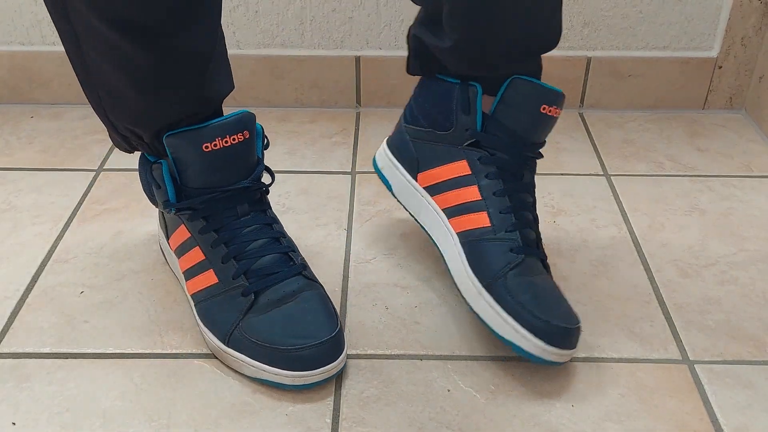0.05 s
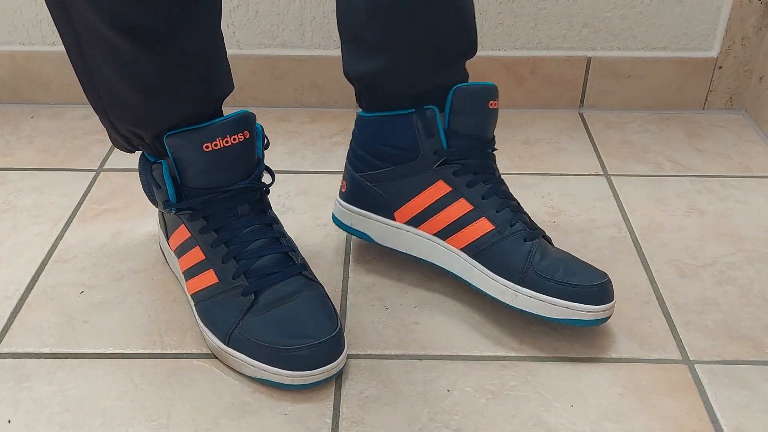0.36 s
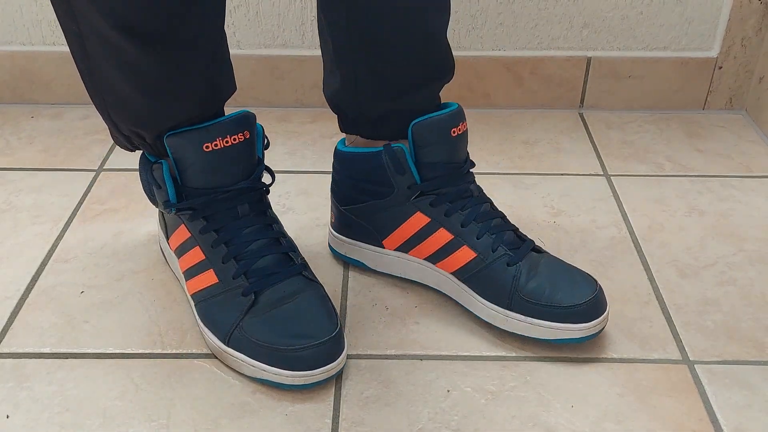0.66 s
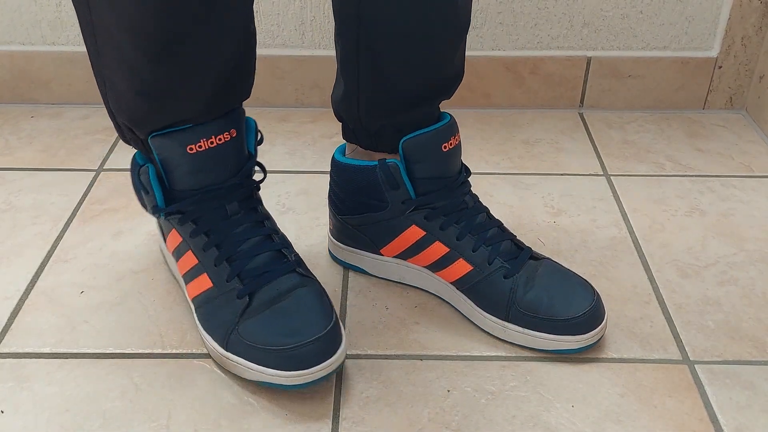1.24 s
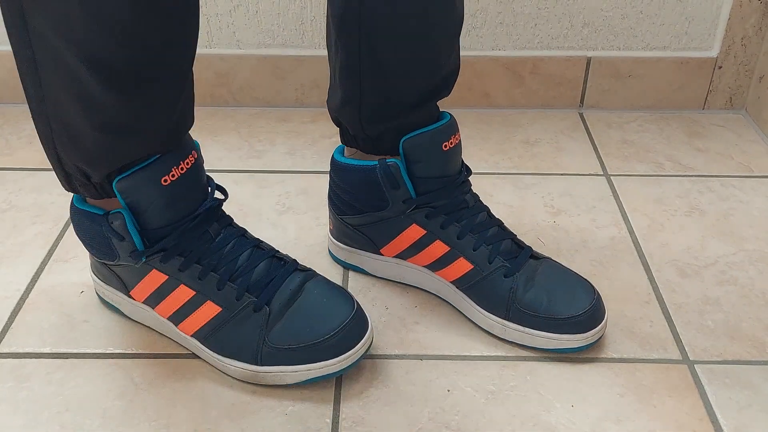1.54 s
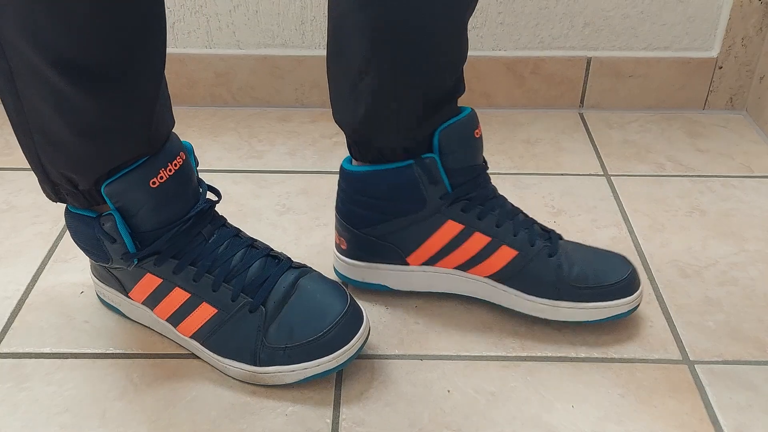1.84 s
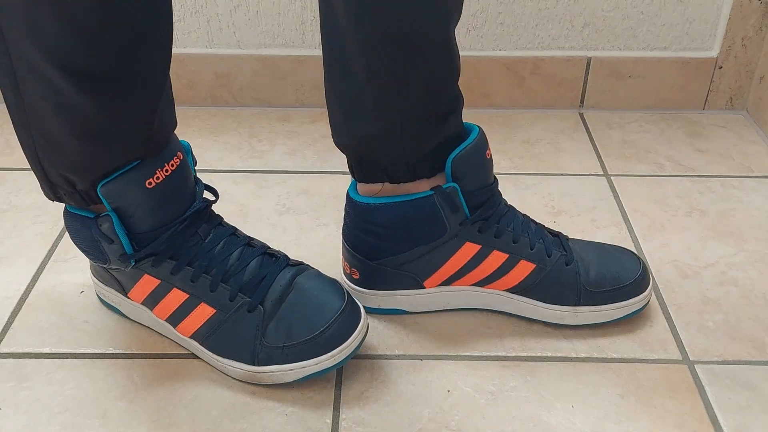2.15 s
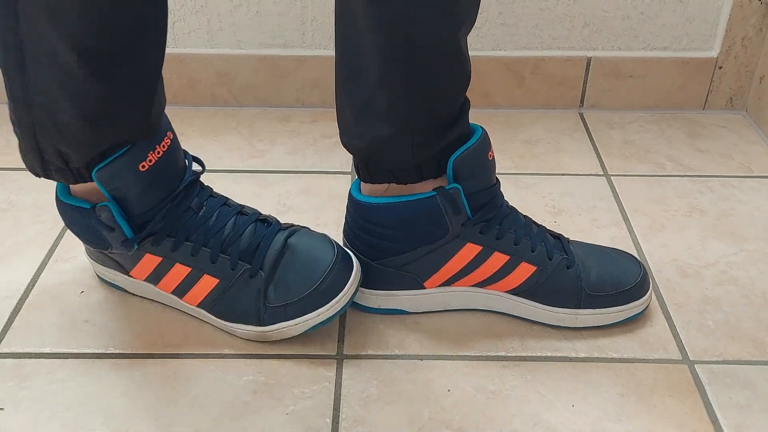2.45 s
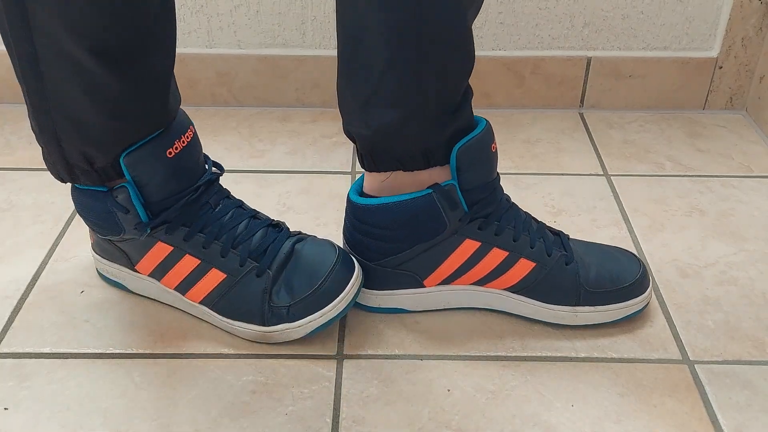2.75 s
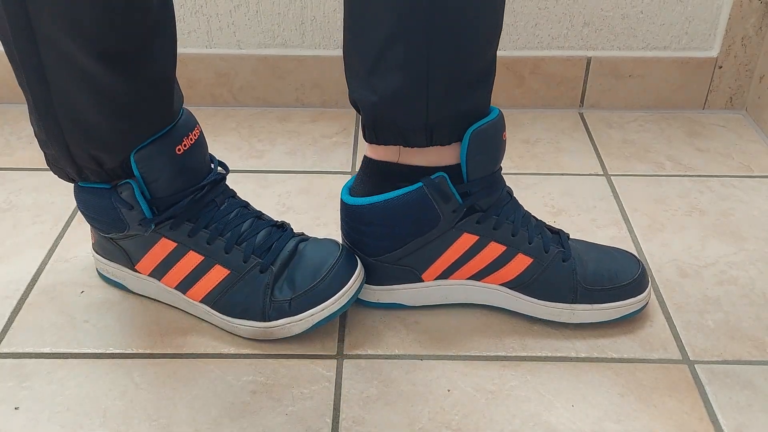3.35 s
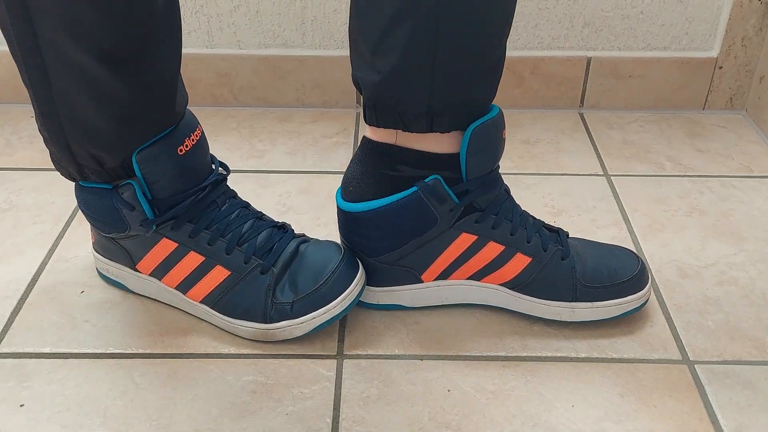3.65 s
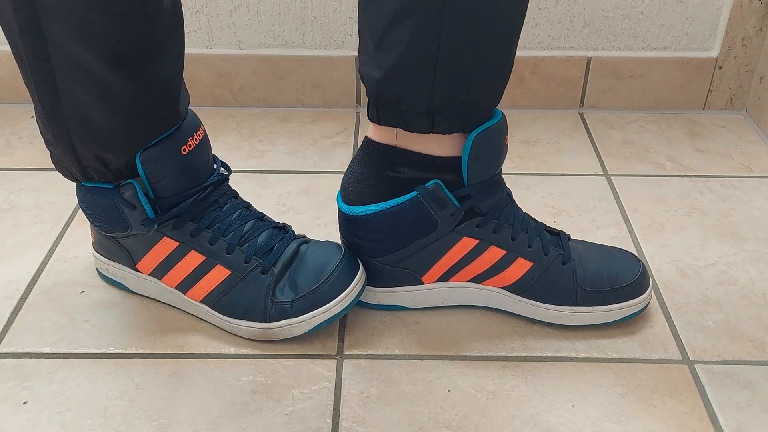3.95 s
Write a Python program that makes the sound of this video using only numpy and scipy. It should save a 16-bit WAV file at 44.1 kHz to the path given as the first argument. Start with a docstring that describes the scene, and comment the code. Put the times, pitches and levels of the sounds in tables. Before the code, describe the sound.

A socked foot is dragged out of a sneaker in a small hard room. First a sole scuffs and lands dully on tile at about 0.3 seconds, followed by faint ticks, scuffs and trouser swishes. From 2.5 seconds the heel sticks and slips, making rapid, uneven hollow knocks with short crackling creaks over a grainy rub, loudest around 3.6 to 3.7 seconds, then stopping. A low rumble lies underneath.

```python
"""A socked foot is dragged out of a sneaker while the other shoe pins its heel. The sock sticks and slips
on the padded lining: each slip is a hollow knock in the shoe with a short crackling creak, over a grainy
rub. Leading up to it, the sneaker is set down on a tiled floor, soles scuff and tick, and trouser legs
swish. It all plays in a small hard room, over a low rumble."""
import sys
import numpy as np
from scipy import signal
from scipy.fft import rfft, irfft
from scipy.io import wavfile

SR = 44100
rng = np.random.default_rng(int(sys.argv[2]) if len(sys.argv) > 2 else 0)


def wrap_up_sound(samples):
    """Save the sound to the file named by the first command line argument, as 16-bit audio."""
    columns = np.atleast_2d(samples).T
    # keep every value between -1 and 1, then stretch to whole-number steps
    tamed = np.clip(columns, -1, 1)
    steps = np.round(tamed * 32767).astype(np.int16)
    wavfile.write(sys.argv[1], SR, steps)


N = 176400
TIME = np.arange(N) / SR

# Cue levels are set ahead of each layer's trim and tone shaping.
# heel slips in the shoe: start_s, knock_db, creak_db
SLIPS = [(2.5, -47, -63), (2.576, -36, -68.5), (2.597, -39.5, -67), (2.629, -37.5, -62),
         (2.777, -34.5, -56.5), (2.813, -35, -74), (2.822, -44, -54), (2.86, -31.5, -49.5),
         (2.886, -33.5, -50), (2.914, -36, -55), (2.933, -33, -56), (2.947, -33, -61), (2.965, -60, -45.5),
         (3.025, -32, -57.5), (3.054, -34.5, -47), (3.085, -32, -53.5), (3.1, -36, -59), (3.114, -30, -42),
         (3.183, -32.5, -56), (3.215, -37, -43), (3.246, -30.5, -57), (3.266, -29, -42),
         (3.276, -32, -46.5), (3.295, -31, -47), (3.308, -51, -49), (3.328, -28.5, -46),
         (3.343, -35, -54.5), (3.357, -31, -47.5), (3.392, -36.5, -54.5), (3.408, -42.5, -49),
         (3.438, -62, -58), (3.463, -35, -50.5), (3.483, -47, -56.5), (3.521, -38, -53), (3.541, -35, -62),
         (3.576, -43, -55), (3.612, -25, -47.5), (3.628, -43, -48), (3.641, -25.5, -46),
         (3.663, -32, -47.5), (3.727, -25, -44), (3.753, -52, -55)]
KNOCK_HZ, KNOCK_PEAK_S, KNOCK_TRIM_DB = 554, 0.002377, -2.5
CREAK_LAG_S, CREAK_RISE_S, CREAK_FALL_S, CREAK_TRIM_DB = 0.0005, 0.0034, 0.0028, 4
# hollow body of the shoe: pitch_hz, level_db, t60_s
SHOE_MODES = [(233, -32, 0.23), (293, -22.5, 0.21), (360, -22, 0.2), (460, -29, 0.14), (745, -31, 0.057),
              (1331, -8, 0.052)]
# stiff back of the shoe: pitch_hz, level_db, t60_s
HEEL_CUP_MODES = [(743, -4.5, 0.022), (1440, -5.5, 0.017), (1800, 0.5, 0.0087), (2250, 2.5, 0.0052),
                  (2600, -18, 0.0038), (4360, -10, 0.0037)]
# successive catches in one squeak: level_db
CATCH_DB = [-6.5, -3, -1.5, -11, -10.5, -8.5]
CATCH_LAG_S, CATCH_GAP_S, SQUEAK_TRIM_DB = 0.003, 0.0011, 2
# sock dragging on the lining: time_s, rub_db, rasp_db, hiss_db
DRAG_LEVELS = [(2.48, -69.5, -70.5, -78.5), (2.568, -67, -81, -73), (2.686, -61, -67, -71),
               (2.752, -51, -62.5, -66), (2.86, -46.5, -60.5, -67), (2.952, -51.5, -70, -70.5),
               (3.12, -53, -69, -72.5), (3.24, -49.5, -61.5, -67), (3.514, -48, -69.5, -68),
               (3.598, -43.5, -61, -64), (3.656, -45, -63, -60), (3.778, -63, -64, -67),
               (3.86, -79, -88, -82)]
RASP_TRIM_DB, HISS_TRIM_DB, STICK_S, STICK_DIP_DB = 3, 6, 0.01, -2
# tone of the sock's creak, rub, rasp and hiss: freq_hz, gain_db
CREAK_EQ = [(150, -5), (500, 4.5), (900, 4), (1150, -3), (1450, 2.5), (1750, -1), (2400, -3), (2900, -6.5),
            (3600, -12), (5000, -14.5), (7500, -21), (9800, -23.5), (12500, -14.5), (16000, -15)]
RUB_EQ = [(30, -44), (60, -6.5), (120, -8.5), (220, 1), (400, -2), (600, -5), (820, -11), (1150, -23.5),
          (2500, -47)]
RASP_EQ = [(400, -39), (900, 3.5), (1170, 0.5), (1420, -2), (1650, 1), (2400, -7), (3500, -14.5),
           (5200, -14), (7000, -62)]
HISS_EQ = [(1500, -23), (4000, 6), (6000, 1), (7500, 4.5), (9800, -1.5), (12500, 9), (16000, 10.5)]

# weight landing on a rubber sole: start_s, level_db, pitch_hz
STEPS = [(.323, -47, 410), (0.334, -47.5, 131), (0.34, -47.5, 60.3), (.349, -47, 295), (0.371, -45, 330),
         (0.406, -60, 244), (0.444, -55, 208), (1.503, -58.5, 86), (1.988, -56, 85.5), (2.501, -48.5, 135),
         (2.517, -45, 79.5), (2.534, -47, 170), (2.551, -48.5, 129), (2.886, -45.5, 93), (3.615, -50, 95),
         (3.66, -37.5, 125), (3.711, -38, 160)]
# tiles booming under the heel: start_s, rise_s, fall_s, level_db
BOOMS = [(.32, 0.0067, 0.044, -54)]
# soles scuffing the tiles: start_s, rise_s, fall_s, scuff_db, grit_db
SCUFFS = [(-.02, 0.024, 0.029, -57.5, -69.5), (0.048, 0.004, 0.041, -60.5, -90),
          (0.084, 0.022, 0.021, -58, -69.5), (0.636, 0.024, 0.073, -71, -82.5),
          (.79, 0.06, 0.15, -80.5, -78), (1.169, 0.034, 0.03, -66, -67), (1.211, 0.047, 0.028, -64, -70.5),
          (1.3, 0.024, 0.091, -69, -77.5), (1.505, 0.027, 0.06, -66.5, -69),
          (1.544, .025, 0.013, -59.5, -85), (1.906, .002, 0.036, -69, -94), (2.263, 0.072, 0.037, -56, -85),
          (2.528, 0.02, 0.24, -57, -72)]
# tread and laces ticking: start_s, body_db, top_db
TICKS = [(0.057, -46, -78), (0.639, -58.5, -88), (0.803, -52, -80), (0.853, -50, -82), (0.913, -50.5, -75),
         (1.001, -52, -73), (1.08, -49.5, -77), (1.91, -53.5, -81), (2.077, -56.5, -74)]
TICK_RISE_S, TICK_FALL_S, TICK_TRIM_DB, TOP_TRIM_DB = 0.0011, 0.0045, -9.5, 5
# thin bright clicks: start_s, rise_s, fall_s, level_db
CLICKS = [(.321, 0.0011, .01, -78), (2.695, 0.0011, 0.0039, -45)]
# trouser swishes: start_s, rise_s, fall_s, level_db
SWISHES = [(-.02, 0.042, 0.21, -75.5), (1.495, 0.0064, .02, -66), (1.51, 0.025, .03, -63.5),
           (1.7, 0.068, 0.078, -67.5), (2.22, 0.15, 0.052, -64.5), (3.93, 0.084, 0.017, -67)]
# tone of the footwork and cloth: freq_hz, gain_db
BOOM_EQ = [(40, -8), (80, -4), (160, 5), (280, 0.5), (480, -4.5), (700, -6.5), (950, -18), (1500, -39.5)]
SCUFF_EQ = [(60, -18), (250, -10.5), (400, 1), (480, 2), (580, 4.5), (700, -1.5), (880, -3), (1200, -8),
            (1450, -11.5), (2000, -15.5), (3200, -36), (16000, -41)]
GRIT_EQ = [(800, -21), (1600, -2), (2150, 2), (3100, -15.5), (5000, -8), (7000, -9.5), (9800, -14.5),
           (16000, -11.5)]
TICK_EQ = [(150, -12.5), (380, -8.5), (600, 5), (1000, 1), (1700, -1.5), (3000, -15.5), (7000, -16),
           (16000, -44)]
SWISH_EQ = [(300, -6), (1000, -8.5), (2200, 5.5), (3200, -3.5), (6500, 0.5), (9800, -4.5), (12500, 7),
            (16000, 2)]

# reverb decay: freq_hz, t60_s
ROOM_T60 = [(60, 0.72), (250, 0.59), (700, 0.44), (2000, 0.33), (5000, 0.2), (16000, 0.75)]
WALL_DELAY_S, EARLY_FALL_S, EARLY_DB = 0.011, 0.0067, -12.5
# tone of the reverb tail: freq_hz, gain_db
TAIL_EQ = [(30, -19), (55, 1), (78, -3.5), (112, -11), (150, -3), (270, 0.5), (600, -3), (1150, -5.5),
           (1450, -7.5), (3000, -2), (16000, -10.5)]
# standing waves of the room: pitch_hz, level_db, t60_s
ROOM_MODES = [(79.1, 2, 0.31), (148.9, 2.5, 0.49), (164, -10, 1), (201, 8, 1), (334, -10.5, 0.63),
              (431, -1.5, 0.41), (507, -16, 0.51), (586, 0.5, 0.7), (655, -9, .35), (974, -3, 0.48),
              (1110, 3, 0.44), (1370, -10, 0.22)]
# swell of the low rumble: time_s, level_db
RUMBLE_LEVELS = [(0, -60.5), (.27, -70), (.45, -65), (.95, -71), (1.2, -62.5), (1.46, -72), (1.62, -60),
                 (1.88, -68), (2.02, -65), (2.22, -65), (2.55, -61), (4, -59)]
# colour of the rumble and room tone: freq_hz, gain_db
RUMBLE_EQ = [(20, -28.5), (45, -8), (75, 2), (110, -1), (147, -1), (175, -6.5), (300, -7), (600, -20),
             (1200, -26.5), (3000, -40)]
ROOM_TONE_EQ = [(20, 4), (80, 13), (250, 6), (600, -1.5), (1300, -3), (3500, -11), (10000, -12.5),
                (16000, -6)]
RUMBLE_RIGHT_DB, ROOM_TONE_DB = -20.5, -74.5
# stereo width, side against mid: freq_hz, side_db
STEREO_WIDTH = [(60, -11), (200, -19), (400, -13), (700, -2), (1300, -2.5), (2400, -2.5), (4400, -0.5),
                (9000, 1.5)]
# tone of each microphone: freq_hz, gain_db
LEFT_MIC_EQ = [(22, -1), (55, 0.5), (2400, 0), (4400, -0.5), (8000, 2), (13000, -5), (16000, -10.5)]
RIGHT_MIC_EQ = [(22, -10.5), (55, 1.5), (2400, -1), (4400, 2.5), (8000, 2.5), (13000, 0.5), (16000, 1.5)]
CUTOFF_HZ = 15900


def heel_slips():
    """Each slip knocks the shoe and sets off a squeak and a crackle of fibres."""
    pitches = KNOCK_HZ * np.exp(0.12 * rng.standard_normal(len(SLIPS)))
    knocks = sum(from_db(db + KNOCK_TRIM_DB) * thump(s + KNOCK_PEAK_S, hz)
                 for (s, db, _), hz in zip(SLIPS, pitches))
    creaks = strokes([(s + CREAK_LAG_S, CREAK_RISE_S, CREAK_FALL_S, db + CREAK_TRIM_DB)
                      for s, _, db in SLIPS])
    return (shoe_hollow(knocks) + squeaks()
            + friction(creaks, CREAK_EQ, per_s=4000, spread_db=3.2, grain_s=0.00057))


def shoe_hollow(knocks):
    """The cavity and walls of the shoe ring on after a knock."""
    out = knocks
    for hz, db, t60 in SHOE_MODES:
        _, angle, poles = resonance(hz, t60)
        out = out + from_db(db) * signal.lfilter([angle, -angle], poles, knocks + 1e-18) / 2
    return out


def squeaks():
    """A quick, uneven run of catches rings the heel cup after each slip."""
    catches = np.zeros(N)
    for s, _, db in SLIPS:
        gaps = CATCH_GAP_S * rng.uniform(0.5, 1.5, len(CATCH_DB))
        times = s + CATCH_LAG_S + np.cumsum(gaps) - gaps[0]
        catches[(times * SR).astype(int)] += from_db(db + SQUEAK_TRIM_DB + np.array(CATCH_DB))
    ringing = np.zeros(N)
    for hz, db, t60 in HEEL_CUP_MODES:
        _, angle, poles = resonance(hz, t60)
        ringing += from_db(db) * signal.lfilter([0, np.sin(angle)], poles, catches + 1e-18)
    return equalise(ringing, [(100, -19), (600, -1)])  # thin out the bass


def sock_drag():
    """The sock rubs, rasps and hisses on the lining; rub and rasp dip as it sticks before each slip."""
    stuck = np.zeros(N)
    for slip_s, _, _ in SLIPS:
        span = slice(int((slip_s - 2 * STICK_S) * SR), int(slip_s * SR))
        grip = np.clip(2 + (TIME[span] - slip_s) / STICK_S, 0, 1)
        stuck[span] = np.maximum(stuck[span], grip)
    dip = from_db(STICK_DIP_DB * stuck)
    times, *levels = np.transpose(DRAG_LEVELS)
    rub, rasp, hiss = (from_db(np.interp(TIME, times, db, left=-120, right=-120)) for db in levels)
    return (friction(rub * dip, RUB_EQ, per_s=500, spread_db=2.5, grain_s=0.0021)
            + friction(rasp * dip * from_db(RASP_TRIM_DB), RASP_EQ, per_s=700, spread_db=3, grain_s=0.0014)
            + friction(hiss * from_db(HISS_TRIM_DB), HISS_EQ, per_s=4000, spread_db=4.5, grain_s=0.00077))


def footfalls():
    """Rubber soles land with dull thuds that ring the shoe; the tiles boom under the first landing."""
    thuds = sum(from_db(db) * thump(s + 0.682 / hz, hz) for s, db, hz in STEPS)
    boom = friction(strokes(BOOMS), BOOM_EQ, per_s=550, spread_db=2.5, grain_s=0.003)
    return shoe_hollow(thuds) + boom


def sole_scuffs():
    """Soles scrape the tiles: a midrange scuff with grit on top."""
    scuff = strokes([(s, rise, fall, db) for s, rise, fall, db, _ in SCUFFS])
    grit = strokes([(s, rise, fall, db) for s, rise, fall, _, db in SCUFFS])
    return (friction(scuff, SCUFF_EQ, per_s=1200, spread_db=1.5, grain_s=0.0015)
            + friction(grit, GRIT_EQ, per_s=7200, spread_db=5.5, grain_s=0.001))


def ticks():
    """Tread and laces tick, each with a body and a bright top; two thin clicks are top alone."""
    body = strokes([(s, TICK_RISE_S, TICK_FALL_S, db + TICK_TRIM_DB) for s, db, _ in TICKS])
    top = strokes([(s, TICK_RISE_S, TICK_FALL_S, db + TOP_TRIM_DB) for s, _, db in TICKS] + CLICKS)
    return (friction(body, TICK_EQ, per_s=2200, spread_db=1.5, grain_s=0.0012)
            + friction(top, HISS_EQ, per_s=5000, spread_db=-0.5, grain_s=0.00082))


def trousers():
    """Cloth brushes on cloth in a dense, fine grain."""
    return friction(strokes(SWISHES), SWISH_EQ, per_s=12000, spread_db=6, grain_s=0.00068)


def room_reverb(direct):
    """Near reflections from floor and wall, then a short tail with its own decay in each band."""
    t = TIME[:SR]
    spectrum, tail = rfft(stereo_noise(SR)), 0
    log_hz = np.log(np.arange(spectrum.shape[1]) + 1)
    centres_hz, t60s = np.transpose(ROOM_T60)
    for band_weights, t60 in zip(np.eye(len(centres_hz)), t60s):
        band = irfft(spectrum * np.interp(log_hz, np.log(centres_hz), band_weights))
        decay = from_db(-60 * t / t60) * (t > WALL_DELAY_S)
        tail = tail + band * decay / np.linalg.norm(decay)
    early_decay = np.exp(-t / EARLY_FALL_S)
    early = from_db(EARLY_DB) * stereo_noise(SR) * early_decay / np.linalg.norm(early_decay)
    return signal.fftconvolve(direct, early + equalise(tail, TAIL_EQ), axes=1)[:, :N]


def standing_waves(direct):
    """Room modes hum on, dead centre."""
    hum, mono = np.zeros(N), direct.mean(axis=0)
    for hz, db, t60 in ROOM_MODES:
        radius, _, poles = resonance(hz, t60)
        hum += from_db(db) * (1 - radius ** 2) / 2 * signal.lfilter([1, 0, -1], poles, mono)
    return hum


def background():
    """A wavering low rumble, mostly on the left, over quiet room tone."""
    swell = from_db(np.interp(TIME, *np.transpose(RUMBLE_LEVELS)))
    pan = from_db([[0], [RUMBLE_RIGHT_DB]])
    rumble = swell * pan * equalise(stereo_noise(), RUMBLE_EQ, keep_power=True)
    return rumble + from_db(ROOM_TONE_DB) * equalise(stereo_noise(), ROOM_TONE_EQ, keep_power=True)


def friction(envelope, eq, per_s, spread_db, grain_s):
    """Tiny catches of uneven size, each a very short noise burst, under an envelope."""
    sizes = from_db(spread_db * np.minimum(rng.exponential(1, N), 4))
    catches = (rng.random(N) < per_s / SR) * sizes ** 2
    power = signal.lfilter([1], [1, -np.exp(-2 / (grain_s * SR))], catches + 1e-18)
    return equalise(stereo_noise() * envelope * np.sqrt(power / power.mean()), eq, keep_power=True)


def strokes(cues):
    """Envelope of strokes that swell and die away."""
    power = np.zeros(N)
    for start_s, rise_s, fall_s, db in cues:
        span = slice(max(int(start_s * SR), 0), int((start_s + rise_s + 10 * fall_s) * SR))
        t = TIME[span] - start_s
        shape = np.clip(t / rise_s, 0, 1) * np.exp(-np.maximum(t - rise_s, 0) / fall_s)
        power[span] += (from_db(db) * shape) ** 2
    return np.sqrt(power)


def thump(peak_s, hz):
    """One soft pressure pulse with a swing back on either side."""
    pulse = np.zeros(N)
    span = slice(max(int((peak_s - 2 / hz) * SR), 0), int((peak_s + 2 / hz) * SR))
    phase_squared = (np.pi * hz * (TIME[span] - peak_s)) ** 2
    pulse[span] = (2 * phase_squared - 1) * np.exp(-phase_squared)
    return pulse


def resonance(hz, t60_s):
    """Pole radius, pole angle and feedback coefficients of one ringing mode."""
    radius, angle = from_db(-60 / (t60_s * SR)), 2 * np.pi * hz / SR
    return radius, angle, [1, -2 * radius * np.cos(angle), radius ** 2]


def stereo_noise(size=N):
    """White noise, narrow in the bass and wide in the treble."""
    mid, side = rfft(rng.standard_normal((2, size)))
    width = curve_gains(STEREO_WIDTH, size)
    return irfft((mid + side * width * np.array([[1], [-1]])) / np.sqrt(1 + width ** 2), size)


def equalise(x, eq, keep_power=False):
    """Minimum-phase EQ; with keep_power, white noise comes out at the same power."""
    size = 2 ** 13
    gain = curve_gains(eq, size)
    if keep_power:
        gain = gain / np.sqrt(np.mean(gain ** 2))
    cepstrum = irfft(np.log(gain))[:size // 2]
    cepstrum[1:] *= 2
    response = irfft(np.exp(rfft(cepstrum, size)))[:size // 2]
    return signal.oaconvolve(x, np.array(response, ndmin=x.ndim), axes=-1)[..., :x.shape[-1]]


def curve_gains(curve, size):
    """Gain at each FFT bin, read off a decibel curve on a log-frequency axis."""
    hz, db = np.transpose(curve)
    bins_hz = np.maximum(np.arange(size // 2 + 1) * SR / size, 1)
    return from_db(np.interp(np.log(bins_hz), np.log(hz), db))


def from_db(db):
    """Decibels to gain."""
    return 10 ** (np.asarray(db) / 20)


def scene():
    """Sock, shoes and cloth, mixed with the room they excite and its background."""
    direct = heel_slips() + sock_drag() + footfalls() + sole_scuffs() + ticks() + trousers()
    return direct + room_reverb(direct) + standing_waves(direct) + background()


def record(dry):
    """The right microphone is brighter than the left; a steep low-pass cuts the very top."""
    heard = np.array([equalise(dry[0], LEFT_MIC_EQ), equalise(dry[1], RIGHT_MIC_EQ)])
    return signal.sosfilt(signal.ellip(12, 0.1, 80, CUTOFF_HZ, fs=SR, output="sos"), heard)


dry = scene()
out = record(dry)
wrap_up_sound(out)
```